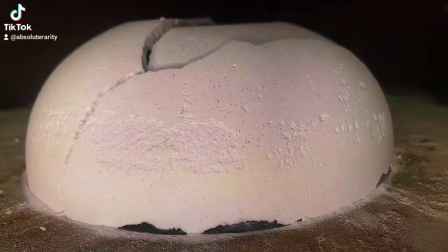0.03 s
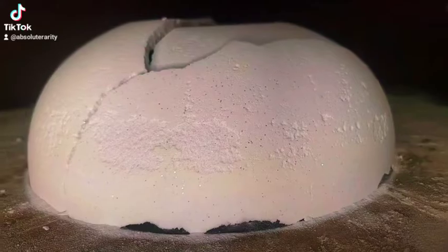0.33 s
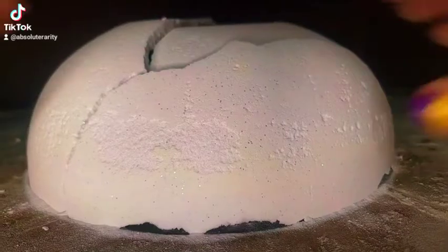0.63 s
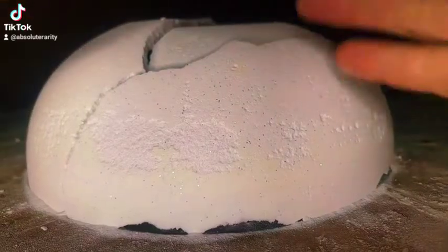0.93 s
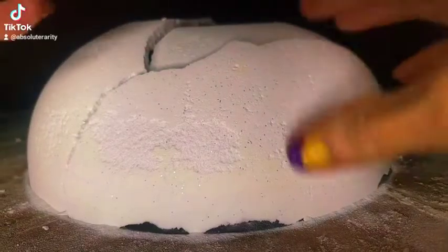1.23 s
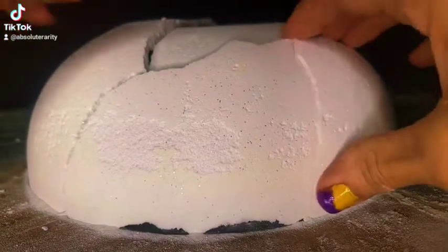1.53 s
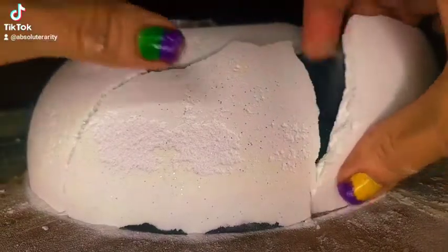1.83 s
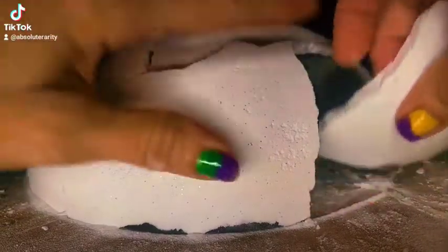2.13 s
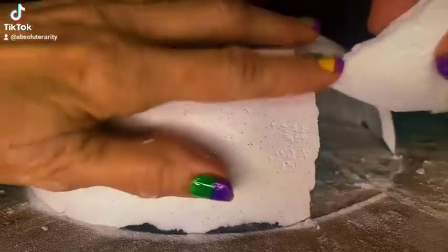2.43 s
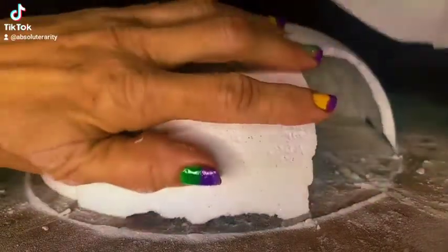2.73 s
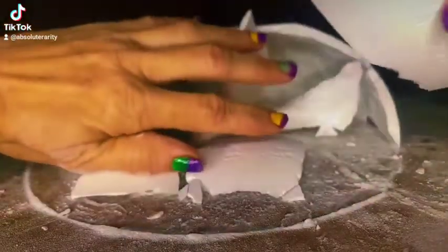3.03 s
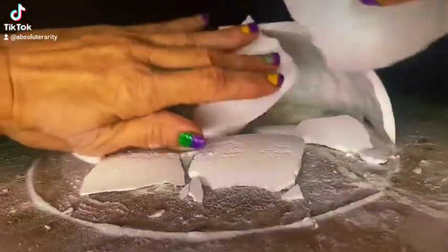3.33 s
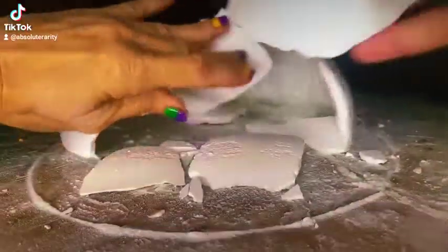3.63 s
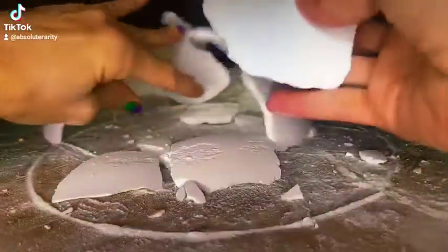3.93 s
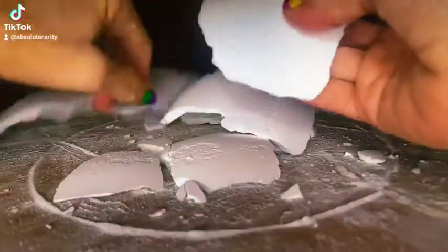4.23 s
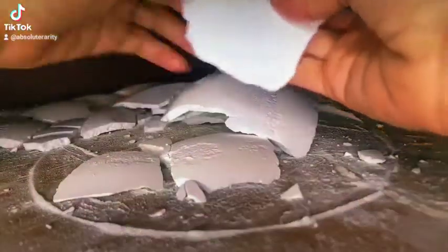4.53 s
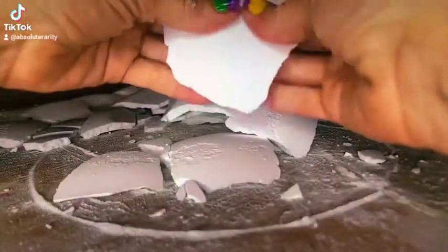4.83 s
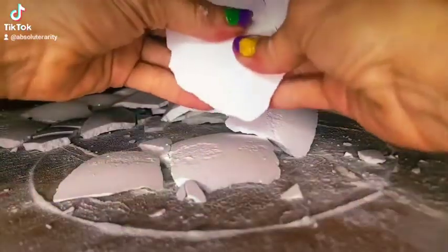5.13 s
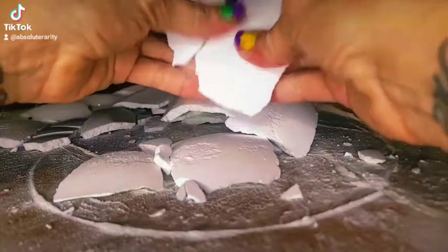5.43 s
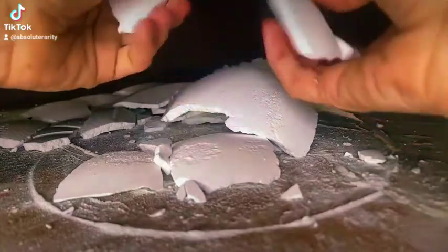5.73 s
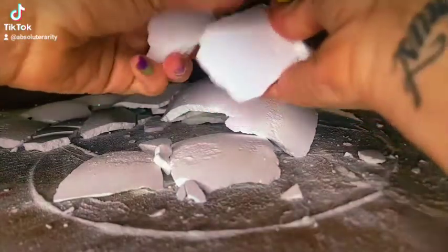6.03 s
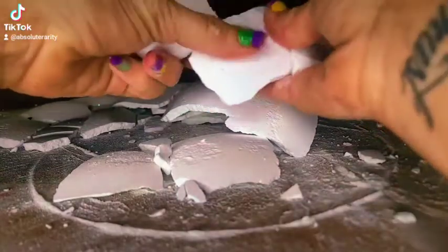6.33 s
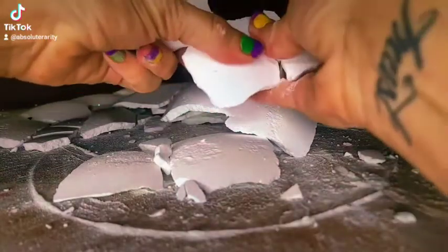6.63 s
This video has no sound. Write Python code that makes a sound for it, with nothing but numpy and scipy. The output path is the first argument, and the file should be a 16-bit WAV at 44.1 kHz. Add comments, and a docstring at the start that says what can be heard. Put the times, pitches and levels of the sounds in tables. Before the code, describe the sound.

A thin, brittle dome of dried powder rasps under fingers, caves in with a crunchy clatter, then a shard is rubbed and snapped.

```python
"""Breaking a dome of dried powder

A thin dome is broken by hand on a gritty board, close up, in a very quiet room. A soft bump on the
board sets it humming. Fingers rasp over the crust and shed hissing powder; the rim grinds and rings
the board. The wall caves in, pieces judder in stick and slip and knock down, chips crack off and
ping. At the end a shard is rubbed and snapped between the fingers."""
import sys
import numpy as np
from scipy import signal
from scipy.fft import rfft, irfft
from scipy.io import wavfile

SR = 44100
rng = np.random.default_rng(int(sys.argv[2]) if len(sys.argv) > 2 else 0)


def dump(signal):
    """Clip the signal to [-1, 1] and save it as 16-bit WAV at the path in sys.argv[1]."""
    limited = np.clip(np.atleast_2d(signal).T, -1, 1)
    pcm = np.round(limited * 32767).astype(np.int16)
    wavfile.write(sys.argv[1], SR, pcm)


N = 299880
TIME_S = np.arange(N) / SR
AGE_S = TIME_S[:SR // 3]

# Spectra (frequency [Hz], level [dB])
ROOM_SPECTRUM = [(20, -11), (45, 0.5), (70, -4.5), (115, -12), (180, -24.5), (500, -21.5), (850, -31),
                 (2200, -36), (3100, -27), (5500, -38), (7500, -47), (16000, -55.5)]
POWDER_SPECTRUM = [(2000, -40.5), (6000, 6.5), (7300, 8.5), (9000, 1), (13000, 0), (16000, -4.5)]
RASP_SPECTRUM = [(150, -40), (900, -14), (1800, -9), (2600, -4.5), (3400, -2.5), (4600, -0.5), (6200, 2),
                 (7000, -8), (8200, -25.5), (16000, -28.5)]
GRIND_SPECTRUM = [(60, -32), (110, -5), (200, -10), (290, -5), (370, 2), (450, -5), (620, 1), (800, -2.5),
                  (950, -13), (1170, -3), (1600, -12.5), (2700, -9.5), (4000, -12), (7000, -34.5)]
CRUNCH_SPECTRUM = [(150, -15.5), (600, 1), (1200, -10), (1700, -4), (2300, -6), (3200, -7), (6300, -15.5),
                   (7300, -29.5), (9000, -32), (16000, -35)]
SNAP_SPECTRUM = [(150, -13), (900, -18.5), (2500, -9.5), (4500, -5.5), (6300, -5), (8000, -17.5),
                 (10000, -25.5), (16000, -31)]
# Stereo width (frequency [Hz], side re mid [dB])
STEREO_WIDTH = [(60, -14.5), (200, -21), (400, -7.5), (700, -9), (1300, -0.5), (2400, -4), (4400, -3.5),
                (15000, 0)]
# Stereo balance (frequency [Hz], left re right [dB])
STEREO_BALANCE = [(200, 1.5), (400, 2), (700, -1), (1300, -0.6), (2400, -0.5), (4400, 5), (8000, -1),
                  (15000, -2.5)]

# Modes of the board and of a loose wall piece on its rim (frequency [Hz], level [dB], t60 [s])
BOARD_MODES = [(99, 3.5, 0.41), (176, 2.5, 0.18), (223.9, 2.5, 0.11), (352.5, 0.5, 0.15),
               (543, -1.5, 0.056), (620, 0.5, 0.069), (700, -1, 0.046), (778, -22, 0.33), (815, -24, 0.3),
               (918, -13, 0.099), (1112, -4, 0.05), (1180, -4.5, 0.1), (1255, -19, 0.13), (1620, -3, 0.036),
               (2230, -2, 0.041)]
WALL_MODES = [(185, 2, .032), (575, 4, .024), (1110, -7, .018), (1580, -6, .006), (3000, -10, .002)]
# Modes of the dome and of the side levered off it (frequency [Hz], width [Hz], level [dB])
DOME_MODES = [(2450, 120, -9.5), (2640, 210, -5.5), (3346, 80, 4.5), (4112, 170, -3), (4870, 68, 2.5),
              (5250, 200, -3.5), (5673, 130, 0), (6170, 70, -6.5)]
SIDE_PIECE_MODES = [(178, 35, -7), (1120, 130, -3.5)]
# How freely the dome rings as it is gripped and broken (time [s], share [0-1])
DOME_FREEDOM = [(0, 0.24), (.53, 0.84), (1.15, 0.94), (1.3, 0.18), (4.4, 0.18), (5.9, 0), (6.2, 0.31),
                (6.8, 0.11)]

# Long pushes of the hand (time [s], rasp [dB], grinding [dB])
PUSH_PRY = [(1.25, -73, -79), (1.27, -72, -92), (1.329, -59, -54), (1.345, -62.5, -68), (1.52, -50, -50),
            (1.614, -59.5, -55), (1.734, -52, -52), (1.796, -59.5, -61), (1.846, -45.5, -47.5),
            (1.908, -42, -46), (2.046, -55.5, -59.5), (2.075, -70, -72)]   # one side is levered off
PUSH_PRESS = [(2.44, -66, -60), (2.506, -53.5, -55.5), (2.518, -47.5, -42), (2.538, -42, -35),
              (2.73, -44.5, -36), (2.795, -35.5, -35), (2.835, -39, -35.5)]   # the wall is loaded until it caves in
PUSH_SPREAD = [(2.89, -46.5, -35.5), (2.91, -45, -37.5), (3.02, -54.5, -50.5), (3.042, -50, -42),
               (3.154, -48.5, -41.5), (3.162, -46.5, -37), (3.254, -50.5, -43.5), (3.388, -51.5, -46.5),
               (3.42, -69, -52)]   # the fallen wall is pushed flat
PUSH_SHOVE = [(3.43, -58.5, -53.5), (3.555, -42.5, -37.5), (3.948, -48.5, -38.5), (3.972, -48, -34.5),
              (4.04, -51, -43), (4.112, -49.5, -44.5), (4.171, -43, -34.5)]   # the back wall slides until it topples
PUSH_SETTLE = [(4.294, -41.5, -32.5), (4.323, -54, -46.5), (4.441, -75, -74)]   # its pieces come to rest
# Short scrapes of crust on the board (time [s], length [s], rasp [dB], grinding [dB])
BOARD_SCRAPES = [(0.2, 0.051, -72, -62), (0.545, 0.097, -57, -54.5), (0.695, 0.05, -60.5, -56),
                 (0.755, 0.053, -75, -76), (0.945, 0.043, -61, -57.5), (1.055, 0.062, -69.5, -65),
                 (2.095, 0.046, -68, -51.5), (2.195, 0.012, -53, -51), (2.285, 0.18, -64, -74.5),
                 (5.29, 0.029, -54, -58)]
# Finger rubs on the held shard (time [s], length [s], rasp [dB], powder [dB], patch pitch [Hz])
SHARD_RUBS = [(4.453, 0.073, -59.5, -79, 5630), (4.544, 0.12, -65, -77, 3540),
              (4.667, 0.2, -61, -72.5, 5100), (4.925, 0.032, -58.5, -76, 5450),
              (5.03, 0.027, -67, -80, 4170), (5.361, 0.059, -60, -78, 4210),
              (5.406, 0.043, -56.5, -67.5, 6000), (5.455, 0.054, -54.5, -65, 4590),
              (5.544, 0.073, -63.5, -71.5, 6100), (5.611, 0.05, -61, -65, 4880),
              (5.669, 0.11, -64, -68, 5670), (5.785, 0.06, -60.5, -65.5, 3500),
              (5.943, 0.11, -60, -71, 5580), (6.072, 0.087, -58.5, -64.5, 6000),
              (6.157, 0.041, -56, -60, 3550), (6.222, 0.068, -52, -57.5, 3210),
              (6.381, 0.11, -59.5, -73, 5400), (6.512, 0.03, -53.5, -61, 2580),
              (6.599, 0.066, -60.5, -78.5, 3300), (6.637, 0.089, -59, -71, 5570),
              (6.728, 0.086, -50.5, -60.5, 6220)]
# Back wall juddering before it topples (time [s], slip rate [1/s], level [dB])
WALL_JUDDER = [(3.948, 201, -42), (3.97, 196, -27), (3.992, 175, -29), (4.009, 174, -41),
               (4.02, 230, -34.5), (4.04, 156, -43)]
# Soft bump on the board (time [s], level [dB], pitch [Hz])
BUMP_CONTACTS = [(0.529, -26.5, 310), (0.531, -38, 680), (0.531, -24.5, 168.7), (0.534, -28, 495),
                 (0.539, -27, 95.6)]
# Chips snapping off (time [s], level [dB], decay [s], chip pitch [Hz], chip ring [dB])
CHIP_SNAPS = [(0.531, -52, 0.012, 3375, 11.5), (1.295, -57, 0.014, 5250, 9),
              (1.992, -40.5, 0.0058, 3660, 8), (2.1, -51, 0.04, 3640, 4), (2.194, -49.5, 0.046, 5340, 19),
              (2.197, -50.5, 0.025, 4390, 21), (2.685, -35.5, 0.0025, 1781, 30.5),
              (2.845, -29.5, 0.006, 6240, 18.5), (2.849, -24, 0.00081, 3000, 24),
              (3.161, -43, 0.0048, 2420, 28), (4.22, -26, 0.0014, 4490, 20.5),
              (4.232, -26, 0.0018, 3730, 1.5), (4.467, -54, 0.0057, 5600, 3),
              (4.695, -58, 0.0031, 4495, 20), (5.008, -43.5, 0.006, 5200, 11.5),
              (5.021, -48.5, 0.0054, 5600, 9), (5.115, -63.5, 0.0056, 4960, 19),
              (5.17, -45, 0.016, 5560, -1.5), (5.274, -48, 0.012, 3210, -11.5),
              (5.314, -52, 0.004, 4330, 7.5), (5.476, -63, 0.0035, 4740, 7), (6.023, -59, 0.0061, 3500, 19),
              (6.124, -52, 0.009, 3540, 7), (6.173, -49, 0.0077, 5670, 14.5),
              (6.181, -61, 0.0071, 3530, 24), (6.325, -38.5, 0.0015, 5520, 19),
              (6.445, -55, 0.0038, 3180, 3), (6.522, -44, 0.012, 4770, -12)]
# Pieces landing (time [s], clack [dB], clack pitch [Hz], thud [dB], thud pitch [Hz], crunch [dB])
PIECE_KNOCKS = [(1.513, -44, 1110, -46, 203, -57), (1.912, -32.5, 810, -37, 98, -33),
                (2.03, -70, 590, -45.5, 99, -43.5), (2.125, -44, 554, -48.5, 176, -67),
                (2.211, -42.5, 583, -37.5, 170, -71), (2.224, -76, 600, -43.5, 96.3, -68),
                (2.685, -18, 1260, -22, 185.2, -24.5), (2.694, -21.5, 620, -30, 195, -52),
                (2.848, -6, 2220, -18.5, 370, -19), (2.849, -7.5, 1084, -15, 171.7, -23.5),
                (2.852, -8.5, 606, -26, 104.5, -41), (2.859, -20.5, 973, -21, 351, -37.5),
                (2.985, -31, 682.7, -30.5, 158.5, -55), (3.066, -34, 700, -35.5, 176, -66),
                (3.163, -23.5, 1152, -32, 160, -39), (3.166, -21, 682, -38, 99, -54),
                (3.2, -48.5, 1020, -62, 103, -31.5), (3.636, -31, 620, -38.5, 214, -54),
                (3.73, -30, 700, -53, 212, -30), (3.82, -43, 820, -36, 193.5, -29.5),
                (3.871, -28, 1060, -37, 200, -28), (3.999, -20.5, 1460, -38, 189, -52),
                (4.064, -30.5, 700, -34.5, 195, -53), (4.138, -31.5, 905.4, -34.5, 197, -40),
                (4.164, -22, 806.4, -30.5, 176, -52), (4.184, -14, 1120, -18, 204, -42),
                (4.198, -15.5, 1180, -40, 197, -22), (4.218, -22.5, 1550, -15.5, 210, -17),
                (4.233, -21, 386, -16.5, 209, -25), (4.257, -19, 1050, -24.5, 198, -21),
                (4.269, -12.5, 930, -23, 296, -29), (4.283, -14.5, 774, -23.5, 176, -28),
                (4.314, -38, 700, -33, 99, -67), (5.165, -46.5, 1077, -70, 198.3, -52),
                (5.276, -56, 812, -48, 185, -43.5), (5.979, -43, 1353, -76, 198, -53),
                (6.521, -67, 700, -48, 154, -68.5)]

CHIP_WIDTH_HZ, RUB_RELEASE_S, MODE_SWING_DB = 170, 0.022, 5


def from_db(db):
    """Decibels to gain."""
    return 10 ** (np.asarray(db) / 20)


def unit_mid(x):
    """Scale a (mid, side) pair to mid rms 1."""
    return x / np.sqrt(np.mean(x[0] ** 2) + 1e-20)


def add(track, start_s, sound):
    """Mix a short sound into a track."""
    part = track[..., round(start_s * SR):][..., :sound.shape[-1]]
    part += sound[..., :part.shape[-1]]


def gain_curve(times_s, levels_db):
    """Gain through the given points, zero outside them."""
    return from_db(np.interp(TIME_S, times_s, levels_db, left=-np.inf, right=-np.inf))


def low_passed(x, hz, order=2):
    """Butterworth low-pass."""
    return signal.sosfilt(signal.butter(order, hz, fs=SR, output="sos"), x)


def coloured(x, spectrum):
    """Minimum-phase filter of the given (Hz, dB) shape."""
    size = 8192
    hz, db = np.transpose(spectrum)
    grid_hz = np.maximum(np.arange(size // 2 + 1) * SR / size, 1)
    cepstrum = irfft(np.log(from_db(np.interp(np.log(grid_hz), np.log(hz), db))))
    cepstrum[1:size // 2] *= 2
    cepstrum[size // 2 + 1:] = 0
    response = irfft(np.exp(rfft(cepstrum)))[:size // 2]
    return signal.oaconvolve(x, response if x.ndim == 1 else response[None], axes=-1)[..., :N]


def drift(rate_hz):
    """Slow random curve, standard deviation 1."""
    step = 40
    r = np.exp(-2 * np.pi * rate_hz * step / SR)
    slow = signal.lfilter([1], [1, -2 * r, r * r], rng.standard_normal(2 * N // step))[N // step:]
    return np.interp(np.arange(N) / step, np.arange(len(slow)), slow / slow.std())


def wandering(x, depth, rate_hz):
    """Let the pitch stray by the share `depth`."""
    position = np.cumsum(1 + depth * drift(rate_hz)) % N
    return np.array([np.interp(position, np.arange(N), channel) for channel in x])


def ring(clicks, hz, t60_s):
    """Mode that rings at height 1 after a unit click."""
    r, w = np.exp(-np.log(1000) / (t60_s * SR)), 2 * np.pi * hz / SR
    return signal.lfilter([.5, 0, -.5], [1, -2 * r * np.cos(w), r * r], clicks + 1e-18)


def resonance(x, hz, width_hz):
    """Band-pass, peak gain 1."""
    r, w = np.exp(-np.pi * width_hz / SR), 2 * np.pi * hz / SR
    zeros = np.array([1, 0, -1]) * (1 - r * r) / 2
    return signal.lfilter(zeros, [1, -2 * r * np.cos(w), r * r], x + 1e-18)


def grains(per_s, spread_db):
    """Tiny fractures of uneven size at random times, as (mid, side)."""
    sizes = from_db(spread_db * np.minimum(rng.exponential(1, (2, N)), 4))
    return unit_mid(sizes * rng.choice([-1, 1], (2, N)) * (rng.random((2, N)) < per_s / SR))


def burst(decay_s, rise_s):
    """Contact envelope: quick rise, exponential decay."""
    return (1 - np.exp(-AGE_S / rise_s)) * np.exp(-AGE_S / decay_s)


def stroke(length_s, release_s, attack_s=0.028):
    """Stroke envelope: swell, hold, release."""
    age_s = TIME_S[:SR]
    swell = np.sin(np.pi / 2 * np.minimum(age_s / attack_s, 1)) ** 2
    return swell * np.exp(-np.maximum(age_s - length_s, 0) / release_s)


def stroke_gains(rows, release_s):
    """Two gain curves from the two level columns of a stroke table."""
    gains = np.zeros((2, N))
    for start_s, length_s, first_db, second_db, *_ in rows:
        add(gains, start_s, from_db([[first_db], [second_db]]) * stroke(length_s, release_s))
    return gains


def freedom():
    """Dome's freedom to ring: 0 damped, 1 free."""
    return np.clip(np.interp(TIME_S, *np.transpose(DOME_FREEDOM)), 0, 1)


def room_tone():
    """Steady noise of the room, mostly rumble."""
    return unit_mid(coloured(rng.standard_normal((2, N)), ROOM_SPECTRUM))


def reflections(x, decay_s):
    """Spray of room echoes, unit energy, different for mid and side."""
    echoes = rng.standard_normal((2, len(AGE_S))) * burst(decay_s, rise_s=0.0033)
    echoes /= np.sqrt(np.sum(echoes ** 2, axis=1, keepdims=True))
    return signal.oaconvolve(x[None], echoes, axes=1)[:, :N]


def powder_hiss():
    """Fine powder sheds in puffs."""
    hiss = unit_mid(coloured(grains(per_s=87000, spread_db=-11.5), POWDER_SPECTRUM))
    return hiss * from_db(1.1 * drift(rate_hz=15))


def crumbs():
    """Loose crumbs tick at random, each at a pitch set by its size."""
    pitches_hz = np.geomspace(3000, 6460, 10)
    ticks = grains(per_s=180, spread_db=3.5)
    size_class = rng.integers(len(pitches_hz), size=N)
    pings = (resonance(ticks * (size_class == k), hz, CHIP_WIDTH_HZ) for k, hz in enumerate(pitches_hz))
    return unit_mid(sum(pings))


def crust_rasp(free):
    """Grains shear off under the fingers and ring the dome as far as it is free."""
    crust = grains(per_s=6500, spread_db=1)
    crust += from_db(-14) * grains(per_s=38, spread_db=-3.5)   # occasional coarse crumb
    # The contact wanders, so each mode swells on its own.
    dome = sum(resonance(crust, hz, width_hz) * from_db(db + MODE_SWING_DB * np.tanh(drift(rate_hz=21)))
               for hz, width_hz, db in DOME_MODES)
    dome = wandering(dome, depth=0.038 * (1 - free), rate_hz=4.5)   # changes of hold shift the modes
    damped = unit_mid(coloured(crust, RASP_SPECTRUM))
    rasp = np.sqrt(1 - free) * damped + np.sqrt(free) * unit_mid(dome)
    return rasp + from_db(-10.5) * (1 - free) * crumbs()


def crunches():
    """Lumps collapse at random, each in a short volley of grains."""
    lumps = np.abs(grains(per_s=110, spread_db=1.5)[0])
    volleys = signal.oaconvolve(lumps, burst(decay_s=0.009, rise_s=0.00063))[:N]
    return unit_mid(coloured(grains(per_s=24000, spread_db=-1.5) * volleys, CRUNCH_SPECTRUM))


def rim_grinding(free, grind_gain, full_load_db=-30.5):
    """Grit under the rim shakes the board; lumps crunch as the load grows."""
    grit = grains(per_s=2800, spread_db=-1.5)
    board = 0
    for k, (hz, db, t60_s) in enumerate(BOARD_MODES[1:]):
        softness_db = -14 * free * np.clip(np.log2(hz / 700), 0, 1)   # light strokes miss high modes
        swing_db = MODE_SWING_DB * np.tanh(drift(rate_hz=16))
        drive = grit * from_db(db + softness_db + swing_db)
        board += ring(drive, hz, t60_s) * (-1) ** k / np.sqrt(t60_s)
    board = wandering(board, depth=0.045 * (1 - free), rate_hz=3)   # sliding pieces shift the load
    load = np.minimum(grind_gain / from_db(full_load_db), 1)
    scratch = from_db(1) * unit_mid(coloured(grit, GRIND_SPECTRUM))
    crunch = from_db(-1) * load * crunches()
    hum_hz, _, hum_t60_s = BOARD_MODES[0]
    hum = from_db(-14) * unit_mid(ring(grit, hum_hz, hum_t60_s))
    return (1 - free) * (scratch + crunch) + from_db(-3) * unit_mid(board) + hum


def hand_gains(grip_from_s=1.29, shard_from_s=4.6):
    """Rasp, grinding and powder gains: power sums of pushes, strokes and the chafing grip."""
    push = np.zeros((2, N))
    for rows in (PUSH_PRY, np.vstack([PUSH_PRESS, PUSH_SPREAD, PUSH_SHOVE, PUSH_SETTLE])):
        times_s, *levels_db = np.transpose(rows)
        push += [gain_curve(times_s, db) for db in levels_db]
    push_rasp, push_grind = push
    scrape_rasp, scrape_grind = stroke_gains(BOARD_SCRAPES, release_s=0.028)
    rub_rasp, rub_powder = stroke_gains(SHARD_RUBS, RUB_RELEASE_S)
    chafe = from_db(3 * drift(rate_hz=19))
    grip, shard = chafe * (TIME_S > grip_from_s), chafe * (TIME_S > shard_from_s)
    rasp = [from_db(-0.5) * push_rasp, scrape_rasp, rub_rasp,
            from_db(-72.5) * grip, from_db(-70) * shard]
    grind = [from_db(-1) * push_grind, scrape_grind]
    growth = 1.31   # powder grows faster than rasp with force
    powder = [from_db(1.5) * push_rasp ** growth, from_db(-12) * scrape_rasp ** growth, rub_powder,
              from_db(-83.5) * grip, from_db(-77) * shard]
    return [np.linalg.norm(parts, axis=0) for parts in (rasp, grind, powder)]


def rubbing():
    """Stick-slip friction driven by the hand: rasp, grinding and powder hiss."""
    rasp_gain, grind_gain, powder_gain = hand_gains()
    free = freedom()
    friction = rasp_gain * crust_rasp(free)
    friction += grind_gain * rim_grinding(free, grind_gain)
    friction += powder_gain * powder_hiss()
    return friction * from_db(0.39 * drift(rate_hz=36))


def side_piece():
    """Grit under the levered-off side rings it lightly."""
    times_s, _, grind_db = np.transpose(PUSH_PRY)
    grit = grains(per_s=2500, spread_db=1.5)
    body = sum(from_db(db) * unit_mid(resonance(grit, hz, width_hz))
               for hz, width_hz, db in SIDE_PIECE_MODES)
    return body * gain_curve(times_s, grind_db)


def shard_rings(ring_db=-5.5):
    """Each rub rings another patch of the shard at its own pitch."""
    grit, out = grains(per_s=550, spread_db=2.5), np.zeros((2, N))
    for start_s, length_s, rasp_db, _, hz in SHARD_RUBS:
        drive = np.roll(grit, -round(start_s * SR), axis=1)[:, :SR]
        patch = unit_mid(resonance(drive, hz, width_hz=73))
        add(out, start_s, from_db(rasp_db + ring_db) * patch * stroke(length_s, RUB_RELEASE_S))
    return out


def judder(jitter=0.034, side_db=-17):
    """The rim catches and slips in a quick run; each slip rings the wall: a short dull groan."""
    times_s, slips_per_s, levels_db = np.transpose(WALL_JUDDER)
    rate_hz = np.interp(TIME_S, times_s, slips_per_s) * (1 + jitter * drift(rate_hz=79))
    cycles = np.cumsum(rate_hz * (TIME_S > times_s[0])) / SR
    slips = np.diff(np.floor(cycles), prepend=0) * gain_curve(times_s, levels_db)
    slips = low_passed(slips + 1e-18, hz=1900)   # powder cushions each slip
    modes = np.array([ring(slips * from_db(db + 0.73 * drift(rate_hz=65)), hz, t60_s)
                      for hz, db, t60_s in WALL_MODES])
    side = modes[::2].sum(axis=0) - modes[1::2].sum(axis=0)
    return np.array([modes.sum(axis=0), from_db(side_db) * side])


def struck_board(contacts, rise_cycles=1.2, decay_cycles=5.2):
    """Each contact (s, dB, Hz) rings briefly at its pitch and drives the board modes near it."""
    body = np.zeros((2, N))
    for start_s, db, hz in contacts:
        phase = 2 * np.pi * hz * AGE_S
        swell = 1 - np.exp(-(AGE_S / min(rise_cycles / hz, 0.003)) ** 2)
        wave = np.array([np.cos(phase), np.sin(phase - 0.45)])   # side lags mid
        add(body, start_s, from_db(db - 6) * swell * np.exp(-hz * AGE_S / decay_cycles) * wave)
    times_s, levels_db, pitches_hz = np.transpose(contacts)
    spot = rng.standard_normal((len(contacts), 2, len(BOARD_MODES)))   # landing spot weights each mode
    for k, (hz, db, t60_s) in enumerate(BOARD_MODES):
        octaves = np.abs(np.log2(hz / pitches_hz))
        strength = from_db(levels_db + db - 6 - 10 * octaves - 2.6 * octaves ** 2 + 2 * spot[:, 0, k])
        clicks = np.zeros((2, N))
        clicks[:, np.round(times_s * SR).astype(int)] = strength, strength * spot[:, 1, k]
        body += ring(resonance(clicks, hz, width_hz=hz), hz, t60_s)   # crumbly edges land softly
    return body


def bump():
    """A padded knock on the board: a dull thud, then the hollow dome hums on."""
    thud = struck_board(BUMP_CONTACTS)
    hum = ring(from_db(-47.5) * signal.unit_impulse(SR), hz=490, t60_s=0.64)
    add(thud[0], BUMP_CONTACTS[0][0], hum)
    return low_passed(thud, hz=870, order=6)


def snaps(dome_ring_db=16):
    """A crack is a volley of grains; it rings the freed chip, and the dome while that is free."""
    volley, out = grains(per_s=31000, spread_db=-0.5), np.zeros((2, N))
    for start_s, db, decay_s, hz, ring_db in CHIP_SNAPS:
        fractures = np.roll(volley, -round(start_s * SR), axis=1)[:, :len(AGE_S)]
        crack = from_db(db) * fractures * burst(decay_s, rise_s=0.0003)
        crack = low_passed(crack, min(2.1 * hz, SR / 2 - 1000))   # large chips are duller
        width_hz = min(CHIP_WIDTH_HZ, 1.3 / decay_s)   # long crack, purer ping
        add(out, start_s, crack + from_db(ring_db) * resonance(crack, hz, width_hz))
    drive = out * freedom() ** 2
    out += sum(from_db(dome_ring_db + db) * resonance(drive, hz, width_hz)
               for hz, width_hz, db in DOME_MODES)
    return coloured(out, SNAP_SPECTRUM) / coloured(volley[0], SNAP_SPECTRUM).std()


def knocks(thud_lag_s=0.006, side_db=-4):
    """A piece lands edge first with a clack and crumbles; its weight follows with a thud."""
    clacks, thuds, crumbling = [], [], np.zeros(N)
    for start_s, clack_db, clack_hz, thud_db, thud_hz, crunch_db in PIECE_KNOCKS:
        clacks.append((start_s, clack_db, clack_hz))
        thuds.append((start_s + thud_lag_s, thud_db, thud_hz))
        add(crumbling, start_s, from_db(crunch_db) * burst(decay_s=0.0081, rise_s=0.002))
    chips = grains(per_s=17000, spread_db=0.5)
    crunch = coloured(chips * crumbling, CRUNCH_SPECTRUM) / coloured(chips[0], CRUNCH_SPECTRUM).std()
    return (struck_board(clacks + thuds) + crunch) * from_db([[0], [side_db]])


def scene():
    """Close sources and a faint room, mixed as (mid, side), returned as (left, right)."""
    direct = rubbing() + side_piece() + judder() + shard_rings() + bump() + knocks() + snaps()
    room = from_db(-10.5) * reflections(direct[0], decay_s=0.0082)
    mid, side = direct + room + from_db(-64.5) * room_tone()
    side = coloured(side, STEREO_WIDTH)
    left = coloured(mid + side, [(hz, db / 2) for hz, db in STEREO_BALANCE])
    right = coloured(mid - side, [(hz, -db / 2) for hz, db in STEREO_BALANCE])
    return np.array([left, right])


def record(dry):
    """Brief silence, quick fade-in, steep treble cut."""
    silence_s, fade_s, cutoff_hz = 0.07, 0.005, 15800
    fade_in = np.clip((TIME_S - silence_s) / fade_s, 0, 1)
    return signal.sosfilt(signal.ellip(10, 0.1, 80, cutoff_hz, fs=SR, output="sos"), dry * fade_in)


dry = scene()
out = record(dry)
dump(out)
```